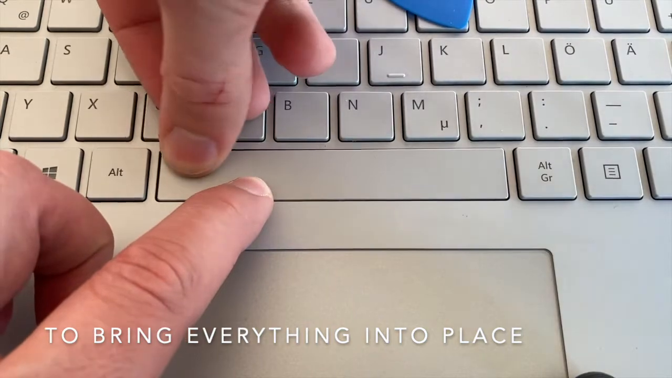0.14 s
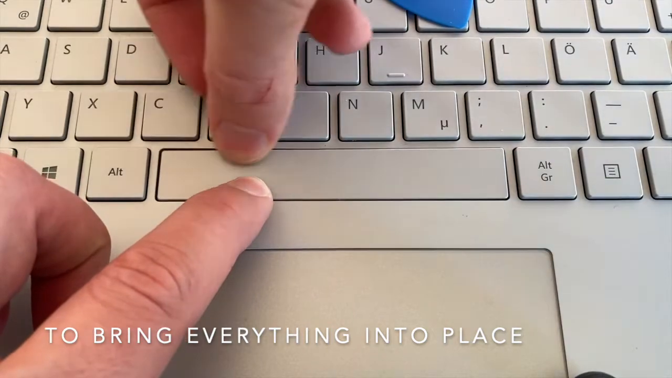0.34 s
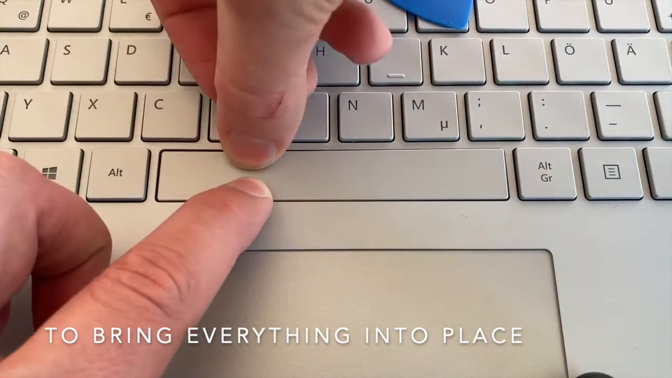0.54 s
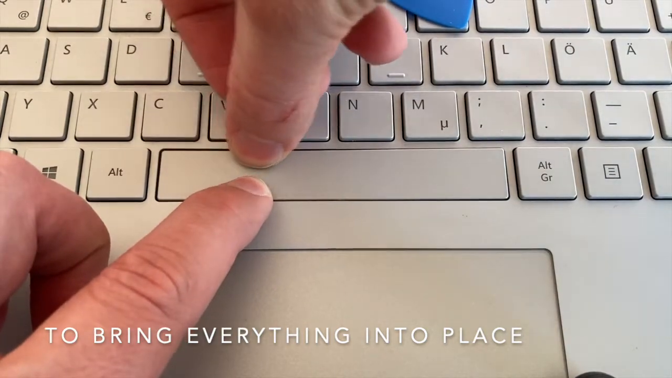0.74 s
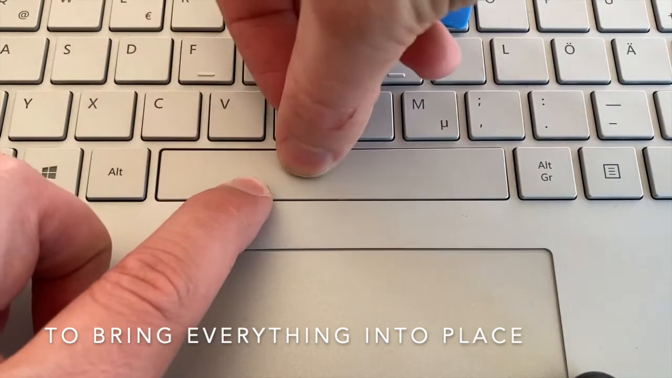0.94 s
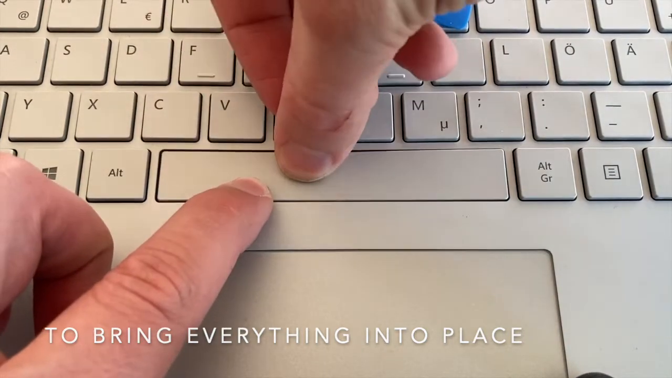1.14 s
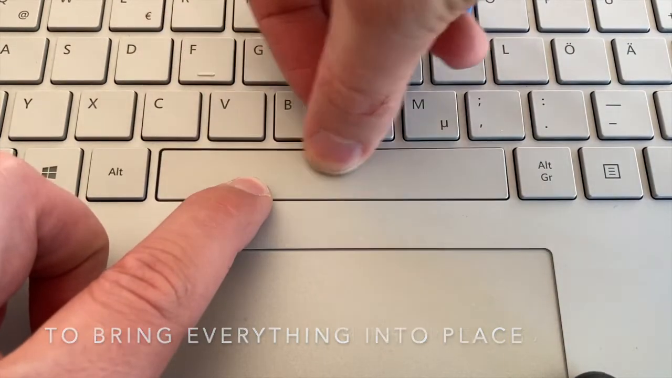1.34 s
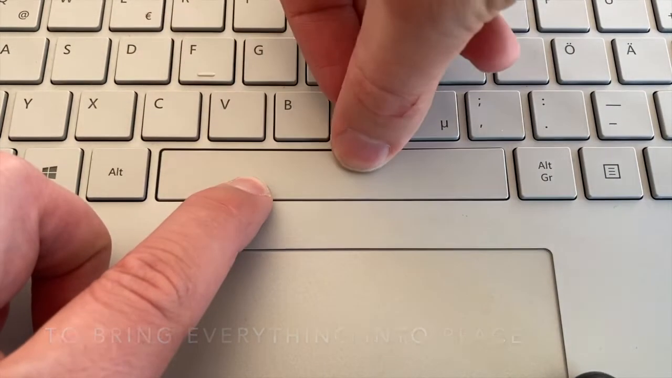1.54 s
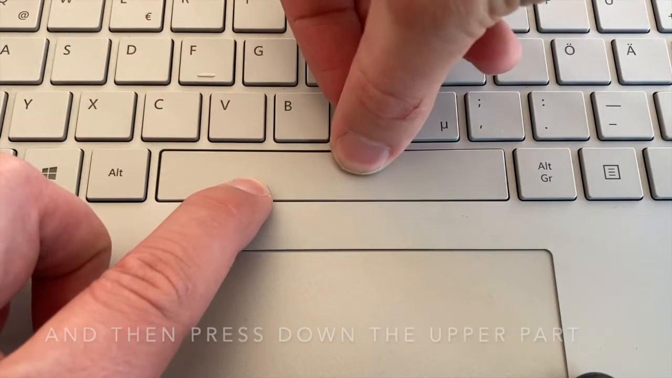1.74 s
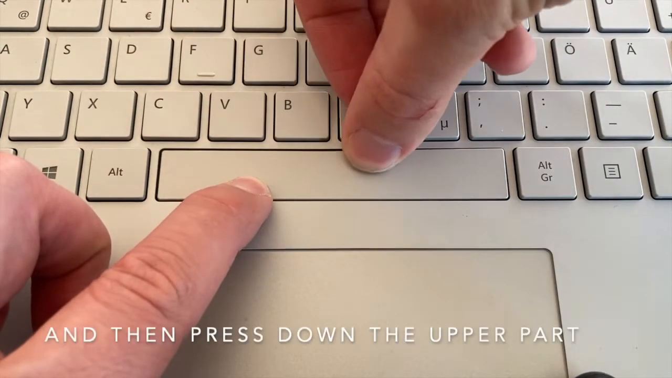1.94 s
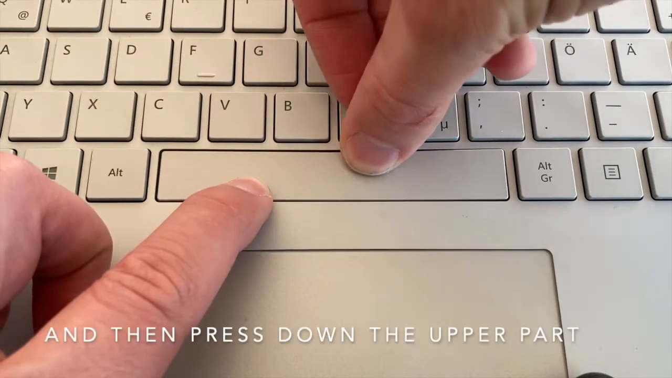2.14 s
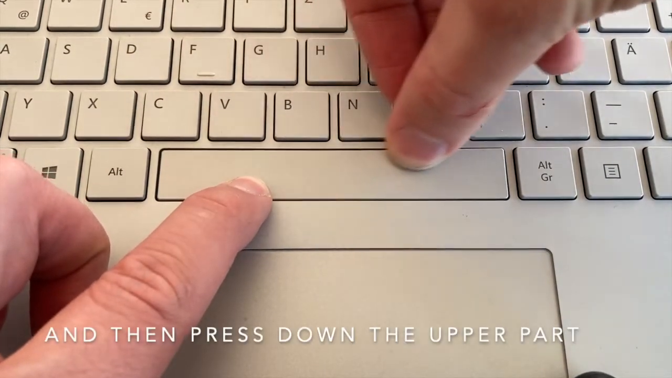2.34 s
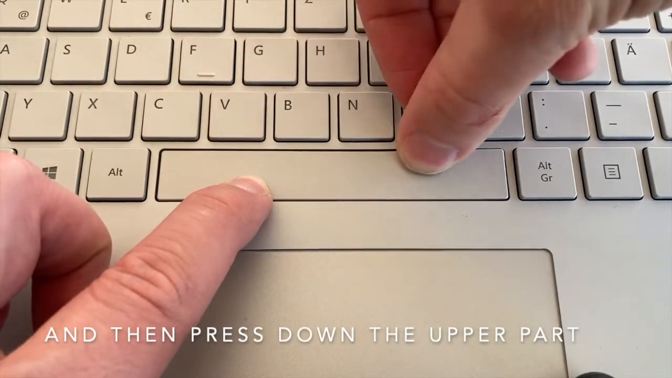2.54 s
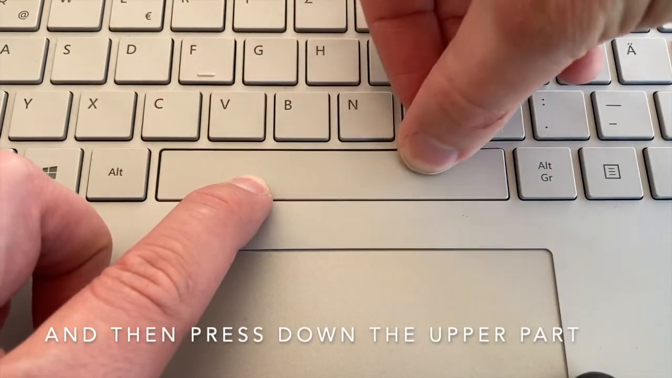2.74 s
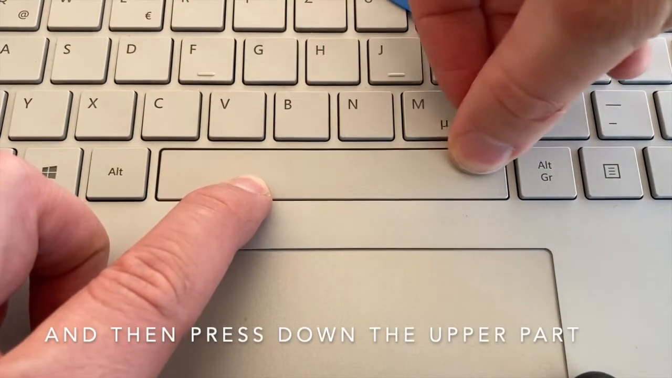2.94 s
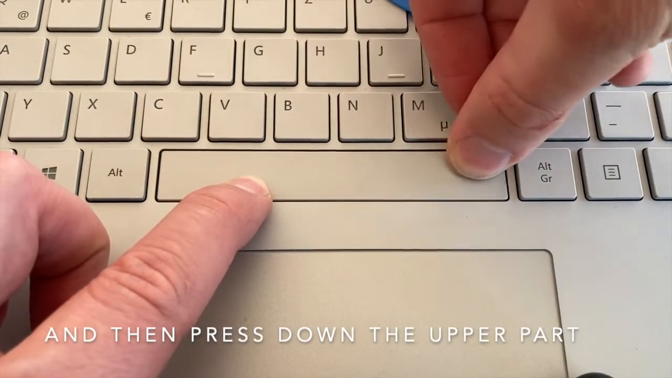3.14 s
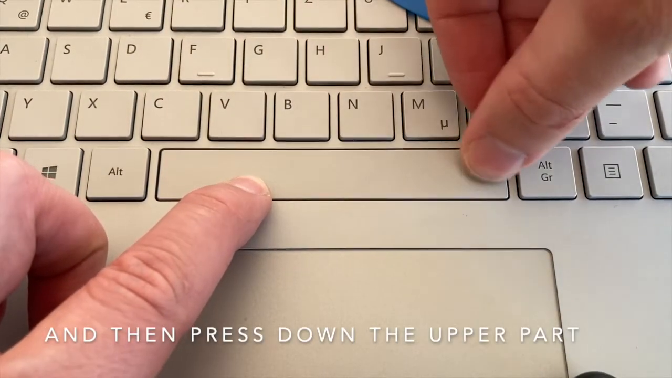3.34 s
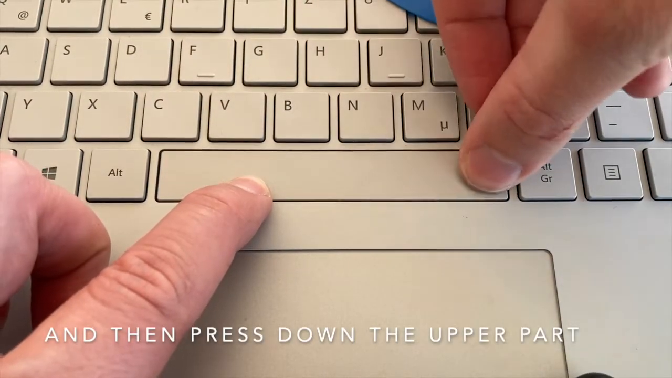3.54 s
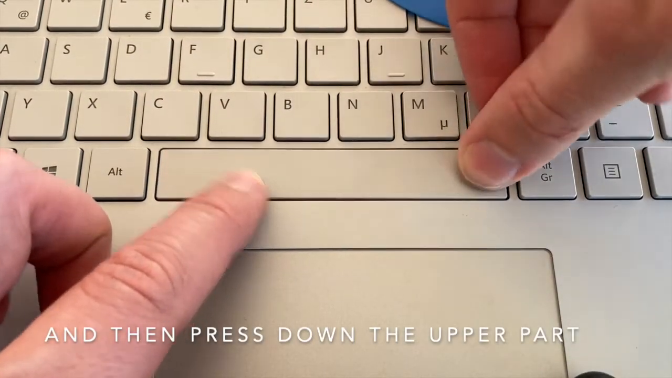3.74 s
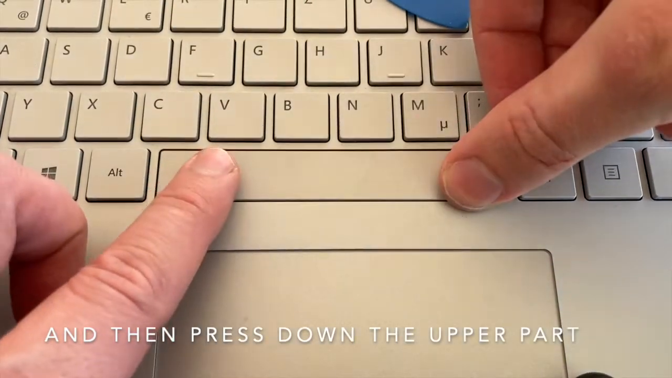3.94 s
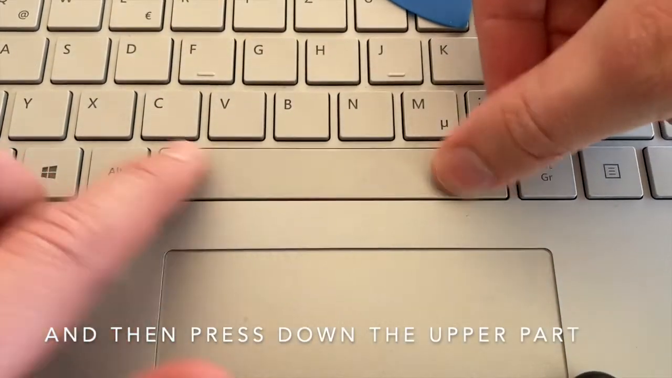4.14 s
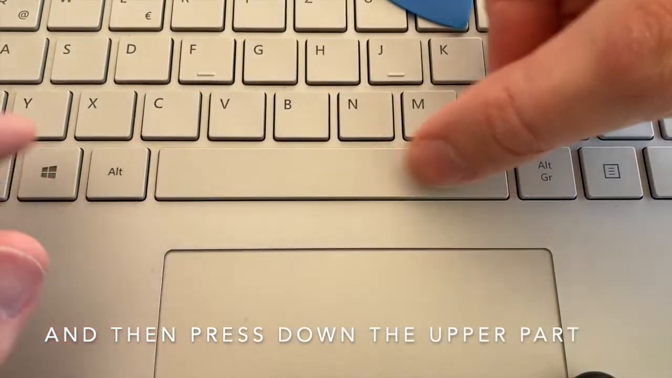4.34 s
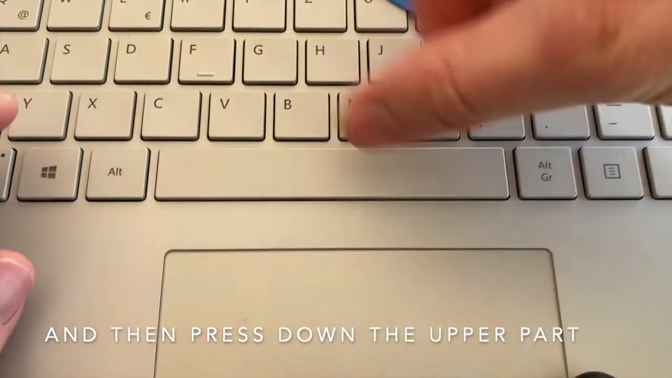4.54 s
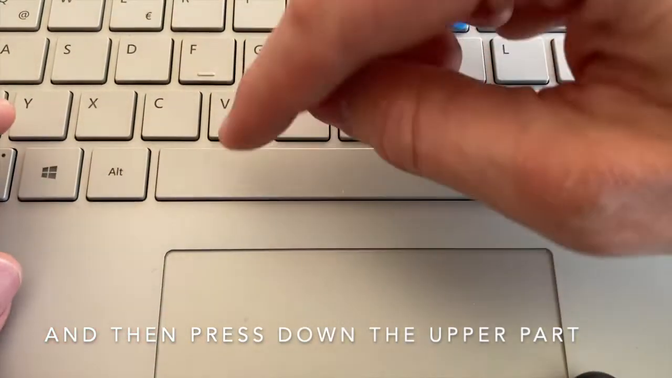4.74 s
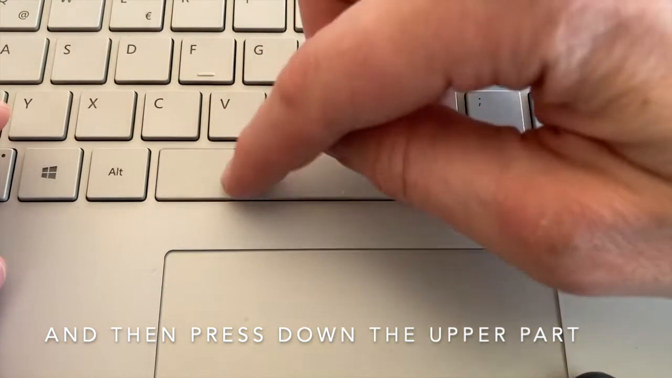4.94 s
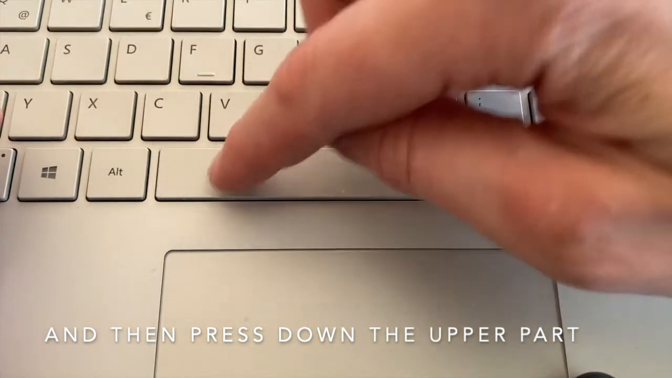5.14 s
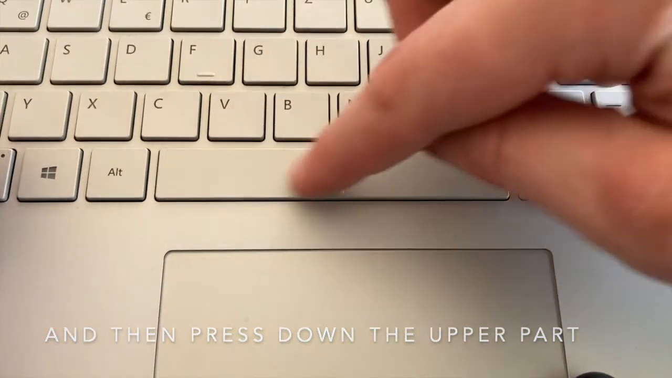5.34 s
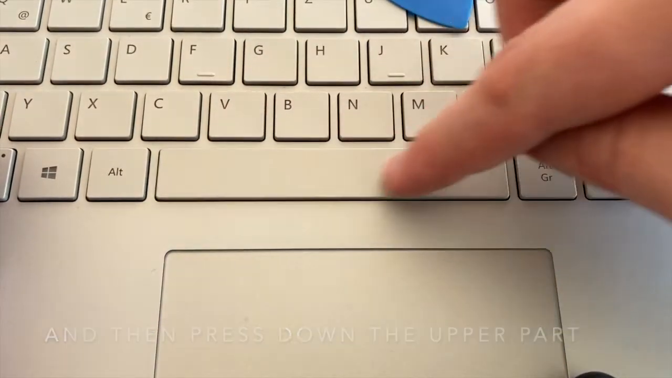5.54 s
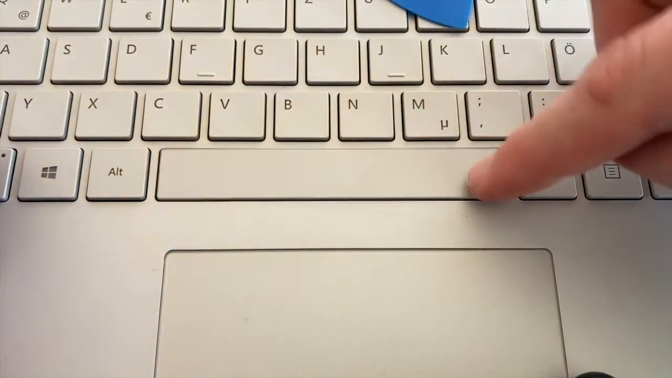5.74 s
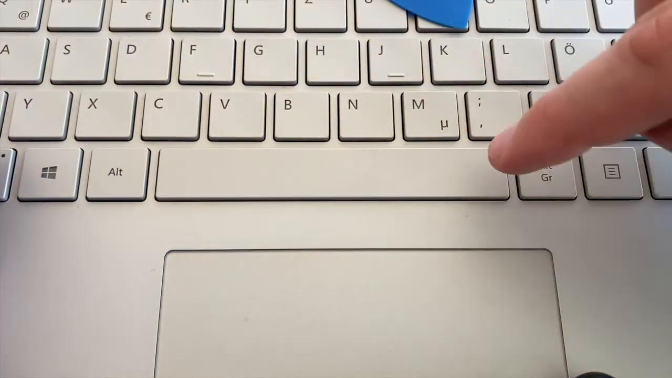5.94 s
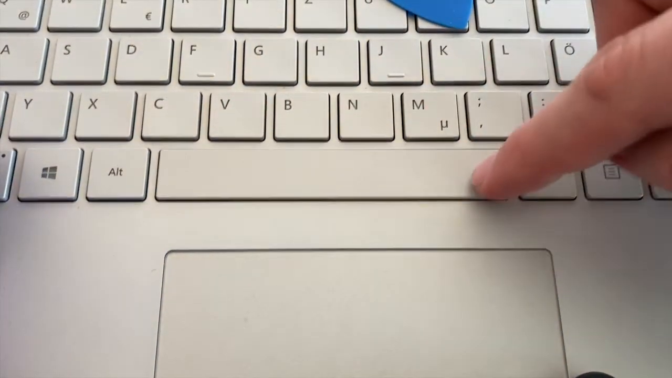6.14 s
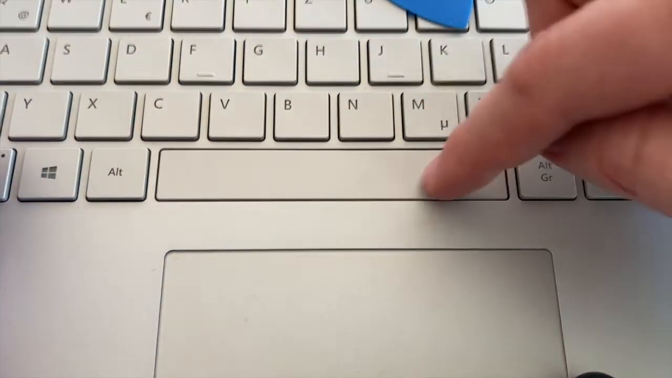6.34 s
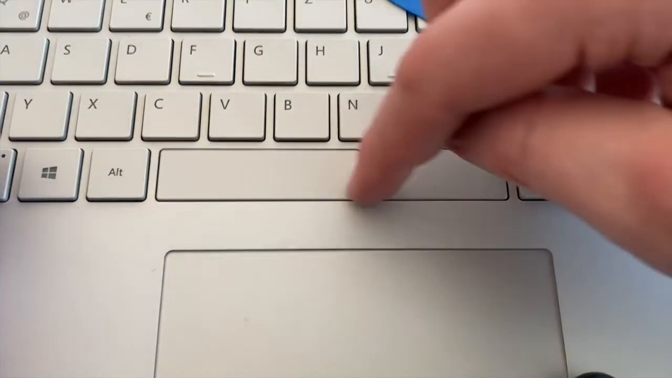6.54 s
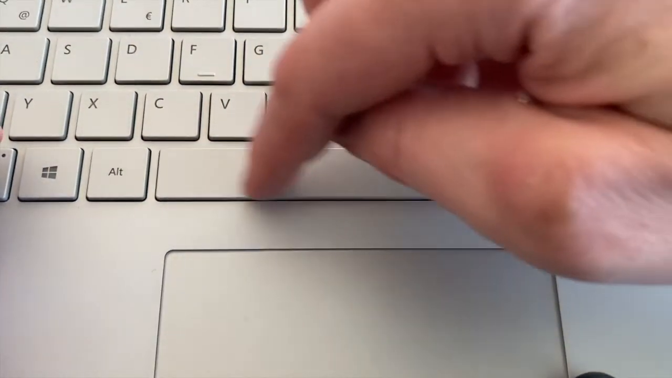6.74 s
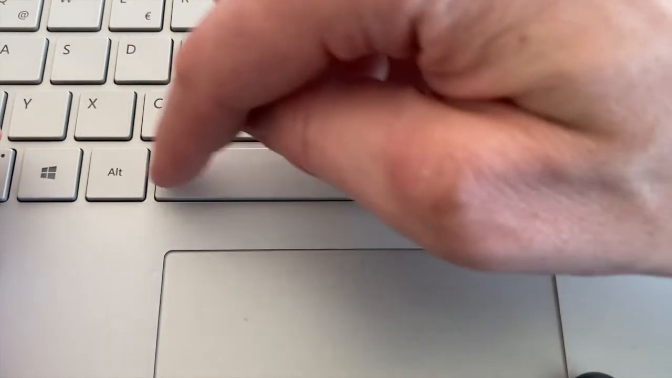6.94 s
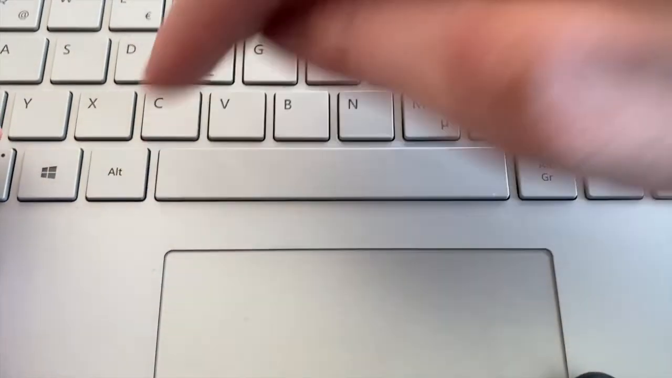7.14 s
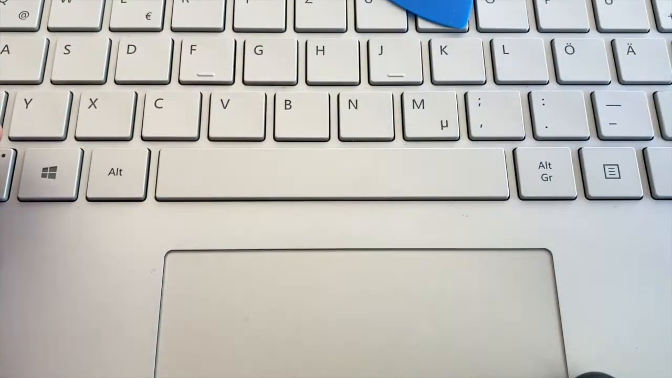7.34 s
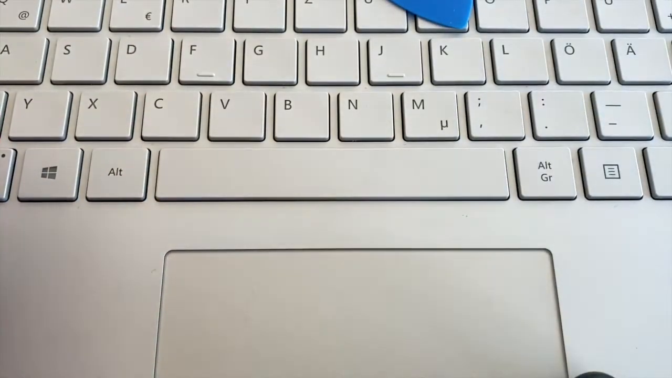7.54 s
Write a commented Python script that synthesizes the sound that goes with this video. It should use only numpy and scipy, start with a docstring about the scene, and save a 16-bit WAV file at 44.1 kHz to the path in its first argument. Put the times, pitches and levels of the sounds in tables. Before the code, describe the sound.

Several loud, crisp clicks of a wide key snapping into place, followed by a dozen or so lighter, rattly key presses in a quiet room.

```python
"""A soft thud and the dying echo of a snap, then a thumb slides along a laptop's long key and snaps its clips home;
later a finger taps the key along its length. Blows are noisy micro-contacts through cap resonances, plus decaying
low modes of case and desk; sliding is grainy filtered noise, with groans of the case. Room echoes, low rumble and
hiss lie behind. Two close microphone ports hear it; the treble reaches the right one first."""
import sys
import numpy as np
from scipy import signal
from scipy.fft import rfft, irfft, next_fast_len
from scipy.io import wavfile

SR = 44100
rng = np.random.default_rng(int(sys.argv[2]) if len(sys.argv) > 2 else 0)


def int16_out(signal):
    """Quantize to a 16-bit WAV file."""
    q = np.round(np.clip(np.atleast_2d(signal).T, -1, 1) * 32767)
    wavfile.write(sys.argv[1], SR, q.astype(np.int16))


N = 334719

# All levels are nominal: per-layer gains follow in key(), slides() and scene().
# clips snapping home: start_s, level_db; re level: top_db, body_db, knock_db, case_db, desk_db;
# contact_t60_s, body_ring_hz, knock_ring_hz
SNAPS = [(0.5231, -5.5, -12, -13.5, -24.5, -35, -41.5, 0.0072, 2170, 999),
         (1.0834, -6.5, -8, -19, -25, -37.5, -47, 0.0046, 2440, 1110),
         (2.0218, -10.5, -8, -16, -25, -36, -44, 0.0067, 3330, 1100),
         (2.5364, -7, -15, -15.5, -32, -38, -50, 0.0078, 2310, 1010),
         (2.9838, -19.5, -10.5, -7, -34.5, -40.5, -51, 0.0046, 3400, 1420),
         (2.9898, -9, -7.5, -25, -47.5, -45.5, -60, 0.0069, 3500, 1200),
         (3.0571, -7, -10.5, -22.5, -24, -37.5, -43.5, 0.0094, 3580, 1210)]
# taps. landing: start_s, level_db, top_db, t60_s; bottoming: start_s, level_db, top_db, t60_s, case_db, desk_db;
# springing back: start_s, level_db, top_db, t60_s, case_db; whole tap: body_ring_hz, knock_ring_hz
TAPS = [(4.389, -51, -8, .03, 4.3975, -23, -5.5, 0.024, -20, -24, 4.46, -35.5, -12, 0.03, -13.5, 2750, 1090),
        (4.8563, -35, -5, 0.011, 4.8673, -30.5, -9, 0.018, -21.5, -24, 4.9112, -34.5, -13, .024, -16.5, 2740, 1030),
        (5.0075, -34.5, -9, .014, 5.0155, -22.5, -7, .018, -20.5, -19, 5.0981, -31.5, -16, 0.02, -18, 2110, 1100),
        (5.1927, -29.5, -15, .011, 5.2003, -29.5, -7.5, 0.032, -20.5, -23, 5.2981, -30, -5, .024, -15.5, 3510, 736),
        (5.3626, -42, -13, .036, 5.3775, -30.5, -7, 0.023, -25.5, -23, 5.4808, -38, -10, .028, -16, 3450, 690),
        (5.5319, -41, -5.5, .008, 5.5511, -36, -4.5, .022, -21, -19, 5.6257, -37.5, -9.5, .046, -13.5, 3500, 1010),
        (5.7036, -33, -12, .02, 5.7179, -33, -5.5, .022, -17, -19, 5.7932, -37, -10, .04, -14, 1900, 1060),
        (6.0497, -32, -8, 0.019, 6.0607, -23, -4, 0.025, -19, -25.5, 6.112, -38, -15.5, 0.037, -7.5, 2430, 1090),
        (6.2731, -40, -3.5, .044, 6.2837, -31, -6, 0.023, -15, -15.5, 6.3374, -43.5, -9, .042, -5, 2560, 766),
        (6.456, -38.5, -6, .026, 6.4654, -27, -11, .019, -17.5, -17, 6.5487, -42, -12, .019, -18, 1900, 1060),
        (6.6083, -41.5, -7, .027, 6.621, -30, -2.5, 0.028, -22, -11.5, 6.7006, -39.5, -10, 0.056, -16, 2180, 1100),
        (6.7902, -42, -3, 0.022, 6.8026, -27.5, -5, 0.014, -20.5, -17.5, 6.8772, -43, -20, .022, -11, 3700, 1330),
        (6.9595, -38.5, -4.5, .03, 6.9686, -26, -10.5, .027, -12.5, -22.5, 7.0352, -32, -9, .021, -15, 2310, 1220)]
# small ticks of the loose cap: start_s, level_db; re level: top_db, knock_db, case_db; knock_ring_hz
TICKS = [(0.7046, -56.5, -4, -4, 6.5, 1070), (0.7303, -54.5, -11, -4, -4, 1080),
         (0.771, -51.5, -13, -8, -14.5, 1100), (1.2394, -52.5, -3.5, -9.5, -9, 1103),
         (1.3471, -58, -18, 1.5, -9, 940), (1.6773, -48.5, 1, -13.5, -23, 1340),
         (1.831, -56.5, -9, -5.5, -1.5, 1063), (2.1786, -48, -8.5, -12, -7.5, 1070),
         (2.7409, -51.5, -13, -24.5, -15.5, 1350), (3.7879, -58, -7, -15, -20, 1100),
         (4.0786, -47.5, -12.5, -23, -16, 778), (4.2474, -59, -5.5, -24, -11, 700),
         (3.385, -64.5, -12.5, -17.5, -10, 1100), (4.2875, -34, -13, -30, -24.5, 1120),
         (4.8936, -49, -9, -21, -30, 1280), (5.0722, -42.5, -10, -24, -8, 651),
         (5.5822, -52, -1, -19.5, -19, 950), (6.3178, -51, -4, -22, -12, 950),
         (6.8488, -45, -11, -16.5, -9, 1297), (7.016, -47, -14, -28, -7, 939)]
# the cap shifts softly under the thumb: start_s, level_db
NUDGES = [(2.503, -52), (3.989, -65)]
# thumb slides along the cap: start_s, end_s, hiss_start_db, hiss_end_db, body_db (re hiss)
SLIDES = [(0.094, 0.325, -65.5, -65, 2.5), (0.727, 0.869, -59, -69.5, -4), (1.252, 1.386, -63.5, -66, -4),
          (1.848, 1.89, -75, -80.5, 0), (2.194, 2.346, -64.5, -64.5, -3), (2.74, 2.887, -64.5, -61, -8),
          (3.27, 3.3, -65.5, -70, -14.5), (3.714, 3.773, -63, -58, -16), (3.83, 3.878, -82, -82, -6),
          (4.086, 4.189, -55.5, -63, -12), (4.269, 4.283, -67, -55, -14), (4.389, 4.39, -58.5, -46, -11)]
# the case flexes under the hand: peak_s, level_db, t60_s
FLEXES = [(0.0, -52.5, .45), (0.61, -40.5, 0.51), (1.2, -61.5, .3)]
# a hand shifts its weight, the desk swings: start_s, level_db
THUDS = [(0.01, -51), (1.64, -63), (1.84, -53), (3.62, -62), (4.06, -61)]
# hands leaning on case and desk: time_s, level_db
RUMBLE_LEVEL = [(0.0, -55.5), (0.15, -63), (0.35, -69.5), (0.63, -58.5), (0.85, -67.5), (1.4, -71),
                (2.07, -62), (2.5, -62.5), (2.8, -66), (3.8, -68), (4.46, -58), (4.8, -69.5), (5.18, -61.5),
                (5.9, -66), (6.25, -60), (6.9, -60), (7.25, -65), (7.59, -71)]

# cap resonances, four ranges: freq_hz, width_hz, level_db
CAP_KNOCK = [(682, 72, -8.5), (1032, 170, -1.5), (1356, 250, -4)]
CAP_BODY = [(2120, 730, 3), (2780, 340, 0), (3340, 450, -0.5)]
CAP_EDGE = [(4260, 420, -2), (5320, 710, -1), (5920, 790, -2), (8000, 2200, 1.5)]
CAP_TOP = [(8820, 1200, -3.5), (10680, 1400, -2.5), (12050, 3670, -1), (13500, 1700, -6),
           (15200, 2700, -8.5)]
# case resonances when flexing: freq_hz, width_hz (of each of two passes), level_db
GROAN_MODES = [(193, 160, -2.5), (277.4, 96, 0.5), (470, 183, -9), (746, 140, -17)]
# modes of case and desk: freq_hz, level_db, t60_s
CASE = [(136, 1.5, 0.091), (155.2, 2.5, .15), (192.3, 0.5, 0.12), (243, -6, .16), (333.2, -5, 0.11),
        (368, -13, 0.06), (515, -14.5, 0.04)]
DESK = [(45, -1, .25), (59.34, 4, .25), (78.5, -3, 0.5)]
# room echoes by octave: centre_hz, level_db, t60_s
ROOM = [(323.4, -30, 0.4), (690, -36, 0.31), (1330, -29.5, 0.36), (2593, -28, 0.38), (6050, -24.5, 0.31),
        (10200, -31, .3)]
# noise spectra: freq_hz, density_db (per Hz)
SLIDE_TONE = [(2500, -34.5), (4000, -7), (6000, -6.5), (8500, -2.5), (10500, -2), (13000, -6), (15800, -10),
              (16300, -48)]
RUMBLE_TONE = [(15, -50.5), (25, -13), (81, -2), (157, -9.5), (200, -13), (239, -9.5), (279, -22),
               (321, -26), (522, -38), (700, -36), (910, -63.5), (1540, -120)]
HISS_TONE = [(180, -34.5), (300, -6.5), (730, -18), (3000, -22.5), (8000, -27.5), (12000, -27.5),
             (15800, -30.5), (16800, -46.5)]
# phase of the left port ahead, lag left out: freq_hz, phase_rad
LEFT_TURN = [(0, 0), (900, 1.9), (1800, 4.2), (2350, 4.4), (2750, 6.6), (3450, 9.3), (4130, 10.5),
             (4820, 11.3), (5850, 10.3), (6500, 9.87), (22050, 9.87)]
# left minus right: freq_hz, gain_db
LEFT_GAIN = [(60, -1.0), (150, -1.5), (380, 2.5), (950, 6.5), (2380, 5), (5980, 1), (15000, -2)]

# tap contacts: body_db, knock_db, tail_db (re level)
LANDING, BOTTOM, RETURN = (-16, -29.5, 0.55), (-18.5, -18.5, 0.1), (-19, -26, -3)
LANDING_THUMP_DB, RETURN_DESK_DB = -30, -28   # re level
TICK_BODY_DB, TICK_TAIL_DB, TICK_DESK_DB = -18.5, -3, -6   # re level; desk re case
TICK_T60_S, TICK_BODY_HZ = 0.02, 2480
SNAP_TAIL_DB, EARLIER_SNAP_DB = -4, -25   # re level; echo of an earlier snap
SLIDE_ATTACK_S, SLIDE_RELEASE_S, BODY_SAG_DB = 0.027, 0.062, 3.5
SLIDE_KNOCK_DB = 4   # the cap's low rings answer the skin most
FADE_DB = 35   # depth of each stroke's fades
# held key: the fingertip rubs louder as it lifts
RUB_DB, RUB_RISE_DB, RUB_AFTER_S, RUB_BODY_DB = -57, 15.5, 0.028, -7.5
# held key: case groan on bottoming (re its level), then a steady part
TAP_GROAN_DB, TAP_GROAN_T60_S, HELD_GROAN_DB, GROAN_ATTACK_S = -23.5, 0.1, -66, 0.012
SPREAD_HZ, SPREAD_DB = 6200, -1.5   # friction radiated unlike at each port
HISS_DB = -77
LEFT_LAG_S = 10 / SR
CUTOFF_HZ = 17000


def from_db(db):
    """Gain of a level in dB."""
    return 10 ** (np.asarray(db) / 20)


def rms_one(x):
    """Scale to rms 1."""
    return x / np.sqrt(np.mean(x ** 2) + 1e-20)


def at_hz(points, hz):
    """Interpolate a table on a log-frequency axis."""
    table_hz, values = np.transpose(points)
    return np.interp(np.log(hz + 1), np.log(table_hz), values)


def drift(rate_hz):
    """Slow random wander, rms 1: white noise through a double low-pass pole."""
    r = np.exp(-2 * np.pi * rate_hz / SR)
    noise = rng.standard_normal(N + SR)
    return rms_one(signal.lfilter([1], [1, -2 * r, r * r], noise)[SR:])


def coloured(spectrum, channels=1):
    """Steady noise of a given spectrum, rms 1."""
    size = next_fast_len(N)
    hz = np.arange(size // 2 + 1) * SR / size
    bins = rfft(rng.standard_normal((channels, size)))
    return rms_one(irfft(bins * from_db(at_hz(spectrum, hz)), size)[:, :N])


def resonate(x, hz, width_hz):
    """Two-pole resonance, peak gain about 1."""
    r = np.exp(-np.pi * width_hz / SR)
    zeros = (1 - r * r) / 2 * np.array([1, 0, -1])
    return signal.lfilter(zeros, [1, -2 * r * np.cos(2 * np.pi * hz / SR), r * r], x)


def add(out, start_s, x):
    """Mix x into out from start_s."""
    i = round(start_s * SR)
    out[i:i + len(x)] += x[:N - i]


def contacts():
    """Spell out every blow for key(): hard snaps, and soft contacts of ticks and taps."""
    snaps = [(*row[:8], SNAP_TAIL_DB, *row[8:]) for row in SNAPS]
    soft = []
    for s, db, top, knock, case, knock_hz in TICKS:
        soft.append((s, db, top, TICK_BODY_DB, knock, case, case + TICK_DESK_DB,
                     TICK_T60_S, TICK_TAIL_DB, TICK_BODY_HZ, knock_hz))
    for tap in TAPS:
        rings_hz = tap[15:]
        phases = [(tap[:4], LANDING, LANDING_THUMP_DB, LANDING_THUMP_DB),
                  (tap[4:8], BOTTOM, tap[8], tap[9]),
                  (tap[10:14], RETURN, tap[14], RETURN_DESK_DB)]
        for (s, db, top, t60), (body, knock, tail), case, desk in phases:
            soft.append((s, db, top, body, knock, case, desk, t60, tail, *rings_hz))
    return snaps, soft


def key(blows, rise_s, edge_db, top_db, body_db, knock_db, case_db, desk_db, wet_db):
    """Blows on the key: cap rattle, ring in opposition at the ports, low thump, impulses for the room."""
    cap, aside, low, shock = np.zeros((4, N))
    for s, db, top_rel, body_rel, knock_rel, case_rel, desk_rel, t60, tail_rel, body_hz, knock_hz in blows:
        t60 = max(t60, 0.004)
        edge = rattle(CAP_EDGE, t60, rise_s, spread_db=2.0)
        add(cap, s, from_db(db + edge_db) * edge)
        top = rattle(CAP_TOP, t60, rise_s, spread_db=2.5)
        add(cap, s, from_db(db + top_rel + top_db) * top)
        for out in cap, aside:
            body = rattle(CAP_BODY, 1.5 * t60, rise_s, spread_db=3.5, favoured_hz=body_hz)
            add(out, s, from_db(db + body_rel + body_db) * body)
            knock = rattle(CAP_KNOCK, 1.8 * t60, rise_s, spread_db=2.0, favoured_hz=knock_hz)
            add(out, s, from_db(db + knock_rel + knock_db) * knock)
        case_level_db = db + case_rel + case_db
        add(low, s, from_db(case_level_db) * thump(CASE, swell_s=0.0029, spread_db=3.5))
        add(aside, s, from_db(case_level_db - 5.5) * thump(CASE, swell_s=0.005, spread_db=3.5))
        add(low, s, from_db(db + desk_rel + desk_db) * thump(DESK, swell_s=0.017, spread_db=2.0))
        add(shock, s, from_db([db + tail_rel + wet_db]))
    return np.array([cap, aside, low, shock])


def rattle(modes, t60_s, rise_s, spread_db, favoured_hz=None):
    """Decaying uneven micro-contacts through cap resonances; energy of a unit burst of 1 ms."""
    t = np.arange(SR // 20) / SR
    hits = rng.laplace(size=len(t)) * (1 - np.exp(-t / rise_s)) * from_db(-60 * t / t60_s)
    hits[round(2 * rise_s * SR)] += 4.0   # first full contact
    # strengths vary at random per burst, and weaken away from the favoured pitch
    strengths_db = rng.normal(0, spread_db, len(modes))
    if favoured_hz:
        octaves_off = np.abs(np.log2(np.array(modes)[:, 0] / favoured_hz))
        strengths_db -= 13.0 * octaves_off
    x = 0
    for k, (hz, width_hz, db) in enumerate(modes):
        ring = rms_one(resonate(hits, hz, width_hz))
        x = x + (-1) ** k * from_db(db + strengths_db[k]) * ring
    return rms_one(x) / np.sqrt(50)   # 50 ms buffer


def thump(modes, swell_s, spread_db):
    """A push builds up in a heavy body and rings its low modes as decaying sines."""
    length_s = min(max(np.array(modes)[:, 2]), 0.5)
    t = np.arange(round(length_s * SR)) / SR
    strengths_db = rng.normal(0, spread_db, len(modes))
    phases_rad = rng.uniform(0, 2 * np.pi, len(modes))
    x = 0
    for k, (hz, db, t60) in enumerate(modes):
        x = x + from_db(db + strengths_db[k] - 60 * t / t60) * np.sin(2 * np.pi * hz * t + phases_rad[k])
    return x * (1 - np.exp(-(t / swell_s) ** 2))


def slides():
    """Grainy skin friction: bright hiss, duller noise through the cap, lumpy groan through the case."""
    hiss_gain, body_gain, groan_gain = friction()
    white = rng.standard_normal(N)
    cap_modes = [*np.add(CAP_KNOCK, [0, 0, SLIDE_KNOCK_DB]), *CAP_BODY]
    # three times as wide as in a blow
    cap = rms_one(sum(from_db(db) * resonate(white, hz, 3.0 * w) for hz, w, db in cap_modes))
    case = rms_one(sum(from_db(db) * resonate(resonate(white, hz, w), hz, w) for hz, w, db in GROAN_MODES))
    grain = from_db(1.2 * drift(60) + 1.7 * drift(12))
    lumps = from_db(3.01 * drift(27))
    bright = from_db(3.0) * hiss_gain * coloured(SLIDE_TONE)[0]
    dull = from_db(-0.3) * body_gain * cap
    groan = from_db(-5.5) * groan_gain * lumps * case
    return grain * (bright + dull + groan)


def friction():
    """Gains of hiss, cap body and case groan from slides, held taps and flexing."""
    hiss, body, groan = np.zeros((3, N))
    fades_s = SLIDE_ATTACK_S, SLIDE_RELEASE_S
    for start, end, start_db, end_db, body_db in SLIDES:
        add(hiss, *stroke(start, end, start_db, end_db, *fades_s))
        add(body, *stroke(start, end, start_db + body_db, end_db + body_db - BODY_SAG_DB, *fades_s))
    flexes = list(FLEXES)
    for bottom, db, back in np.array(TAPS)[:, [4, 5, 10]]:
        start = min(bottom + RUB_AFTER_S, back)
        quiet_db = RUB_DB - RUB_RISE_DB
        add(hiss, *stroke(start, back, quiet_db, RUB_DB, 0.01, 0.01))
        add(body, *stroke(start, back, quiet_db + RUB_BODY_DB, RUB_DB + RUB_BODY_DB, 0.01, 0.012))
        add(groan, *stroke(start, back, HELD_GROAN_DB, HELD_GROAN_DB, 0.01, 0.02))
        flexes.append((bottom + GROAN_ATTACK_S, db + TAP_GROAN_DB, TAP_GROAN_T60_S))
    for s, db, t60 in flexes:
        add(groan, *stroke(s, s, db, db, GROAN_ATTACK_S, t60 * FADE_DB / 60))
    return hiss, body, groan


def stroke(start_s, end_s, start_db, end_db, attack_s, release_s):
    """Start time and gain of a gesture: fade in, straight run in dB, fade out."""
    first_s = max(start_s - attack_s, 0)
    t = np.arange(first_s, end_s + release_s, 1 / SR)
    corners_s = [start_s - attack_s, start_s, end_s, end_s + release_s]
    corners_db = [start_db - FADE_DB, start_db, end_db, end_db - FADE_DB]
    return first_s, from_db(np.interp(t, corners_s, corners_db))


def spread_slides():
    """Low-passed friction radiated by the whole cap, its noise independent at each port."""
    lowpass = signal.butter(4, SPREAD_HZ, fs=SR, output="sos")
    return from_db(SPREAD_DB) * signal.sosfilt(lowpass, [slides(), slides()])


def nudges():
    """Dull little knocks: rattles through the cap's lower resonances only."""
    out = np.zeros(N)
    for s, db in NUDGES:
        knock = rattle(CAP_KNOCK + CAP_BODY, 0.015, 0.00069, spread_db=6.5, favoured_hz=1100)
        add(out, s, from_db(db - 2.5) * knock)
    return out


def thuds():
    """Shifting weight swings the desk's low modes."""
    out = np.zeros(N)
    for s, db in THUDS:
        add(out, s, from_db(db) * thump(DESK, swell_s=0.026, spread_db=4.0))
    return out


def ports(x):
    """Left and right port: treble lags at left; lower down phase turns ahead and level differs."""
    size = next_fast_len(N + 1000)
    hz = np.arange(size // 2 + 1) * SR / size
    turn_rad = np.interp(hz, *np.transpose(LEFT_TURN)) - 2 * np.pi * hz * LEFT_LAG_S
    half_gain = from_db(at_hz(np.add(LEFT_GAIN, [1, 0]), hz) / 2)
    responses = np.array([half_gain * np.exp(1j * turn_rad), 1 / half_gain])
    return irfft(rfft(x, size) * responses, size)[:, :N]


def room(shock, gap_s, rough_db):
    """Octave-band noise echoes, each with its decay, uneven at first: one near part, two diffuse."""
    t, tail = np.arange(SR) / SR, 0
    for hz, db, t60 in ROOM:
        octave = signal.butter(2, [hz / np.sqrt(2), hz * np.sqrt(2)], "band", fs=SR, output="sos")
        noise = rms_one(signal.sosfilt(octave, rng.standard_normal((3, SR))))
        tail = tail + noise * from_db(db - 60 * t / t60)
    uneven = from_db(rough_db * drift(90)[:SR] * np.exp(-t / 0.012))
    onset = 1 - np.exp(-(t / gap_s) ** 2)
    return signal.fftconvolve(shock[None], tail * uneven * onset, axes=1)[:, :N]


def rumble():
    """Lumpy low noise, mostly shared by both ports."""
    mid, side = coloured(RUMBLE_TONE, channels=2)
    level_db = np.interp(np.arange(N) / SR, *np.transpose(RUMBLE_LEVEL))
    return from_db(level_db + 3.0 * drift(6)) * (mid + 0.25 * side * np.array([[1], [-1]]))


def hiss():
    """Steady coloured noise: one part common to the ports, two independent."""
    return from_db(HISS_DB) * coloured(HISS_TONE, channels=3)


def scene():
    """Key, sliding skin, room, rumble and hiss at two ports."""
    hard, soft = contacts()
    snaps = key(hard, rise_s=0.00026, edge_db=-11.5, top_db=5.5, body_db=7.0, knock_db=4.0,
                case_db=1.5, desk_db=5.5, wet_db=-6.0)
    taps = key(soft, rise_s=0.0012, edge_db=-0.55, top_db=7.5, body_db=10.0, knock_db=6.5,
               case_db=0.24, desk_db=1.1, wet_db=-3.5)
    cap, aside, low, shock = snaps + taps
    add(shock, 0, from_db([EARLIER_SNAP_DB]))
    far = room(shock, gap_s=0.0017, rough_db=1.5) + hiss()
    near = cap + nudges() + slides() + low + thuds() + 0.27 * far[0]
    opposed = np.outer([0.4, -0.3], aside)
    return ports(near) + opposed + 0.69 * far[1:] + spread_slides() + rumble()


def record(dry):
    """Steep low-pass: the top is cut."""
    return signal.sosfilt(signal.cheby2(12, 70, CUTOFF_HZ, fs=SR, output="sos"), dry)


dry = scene()
out = record(dry)
int16_out(out)
```